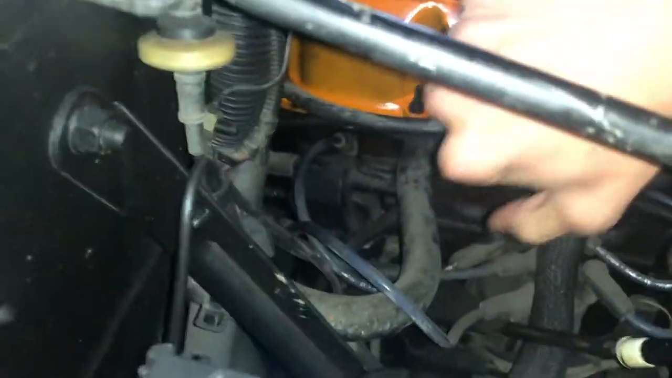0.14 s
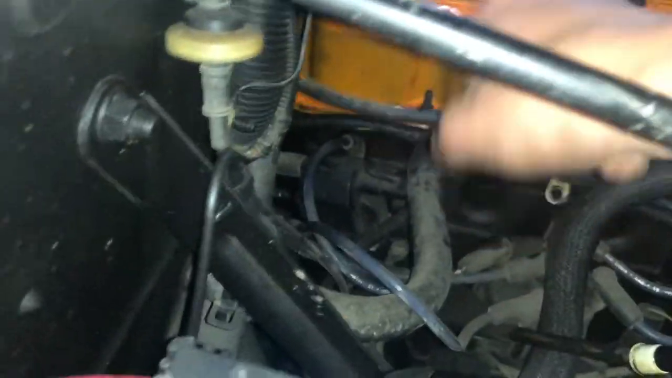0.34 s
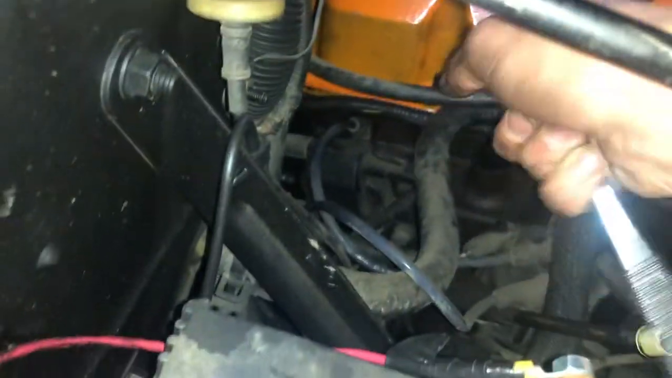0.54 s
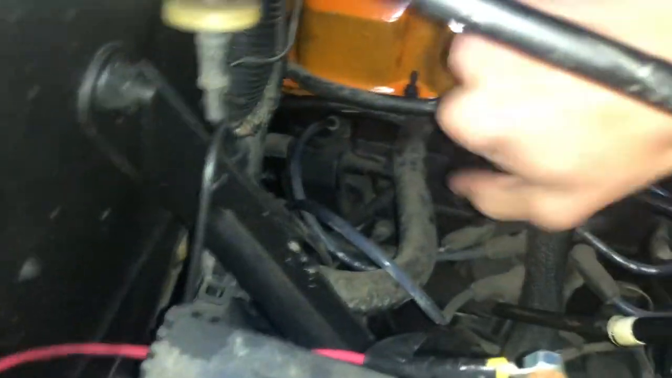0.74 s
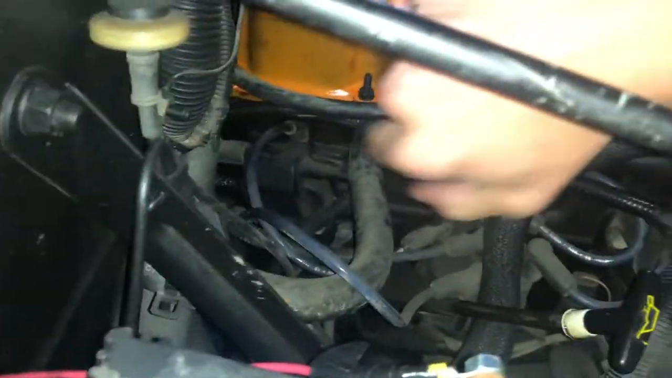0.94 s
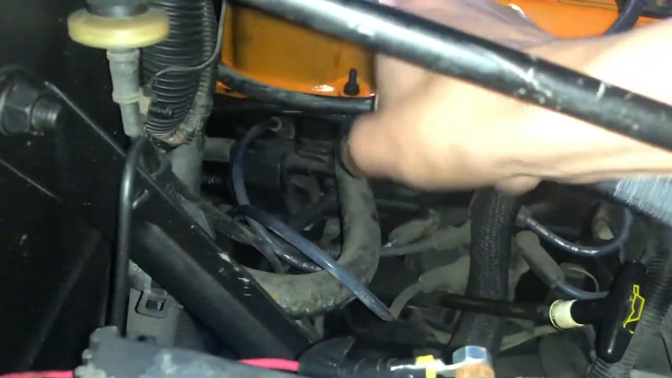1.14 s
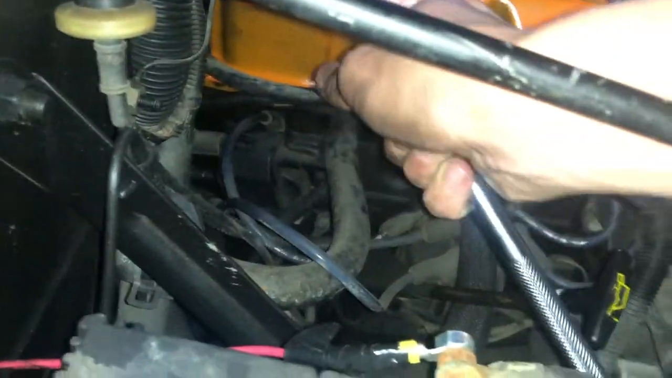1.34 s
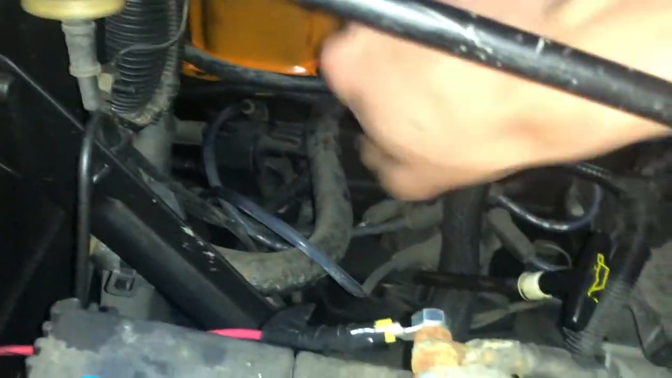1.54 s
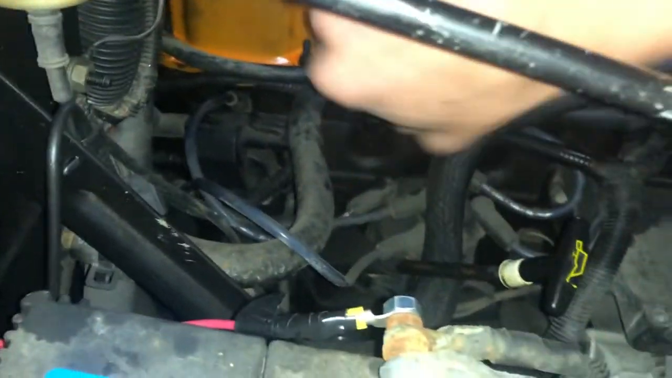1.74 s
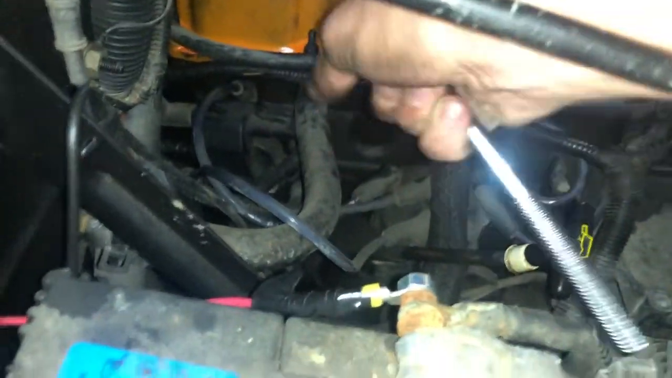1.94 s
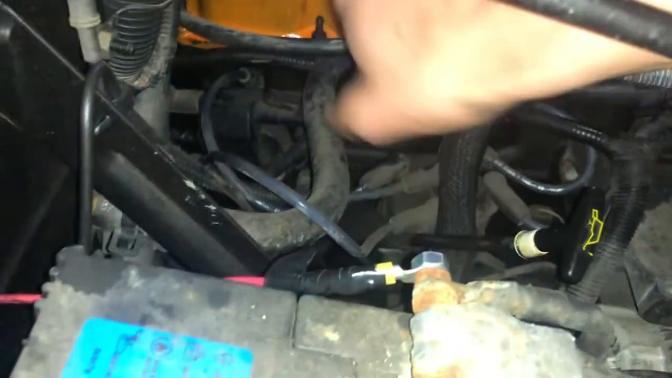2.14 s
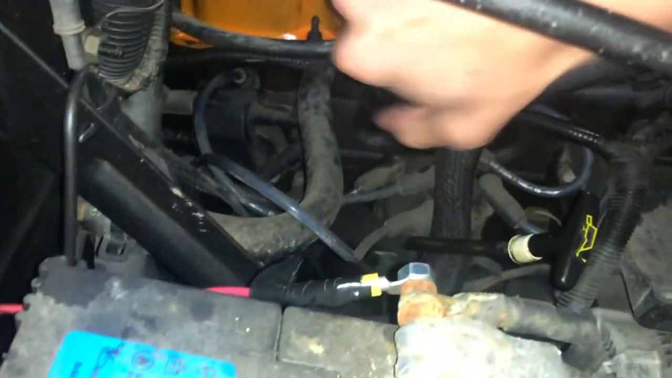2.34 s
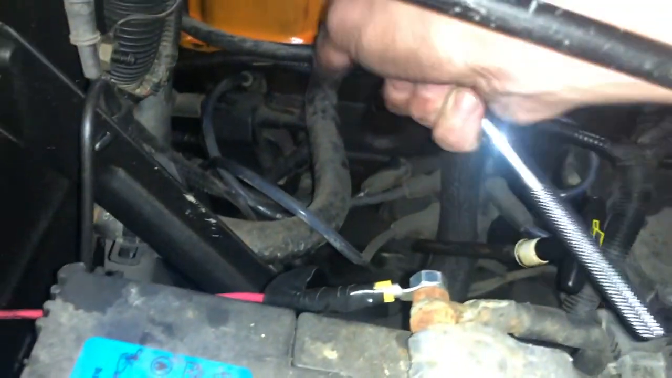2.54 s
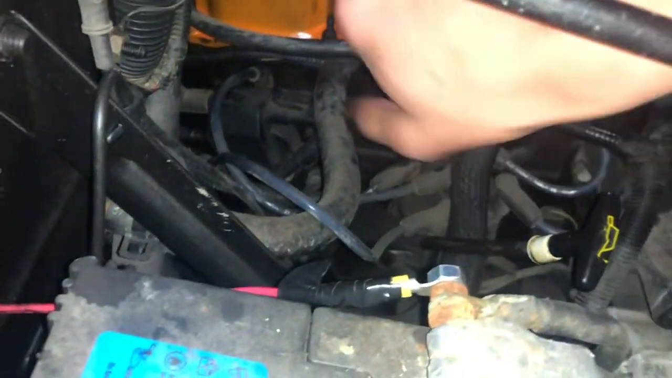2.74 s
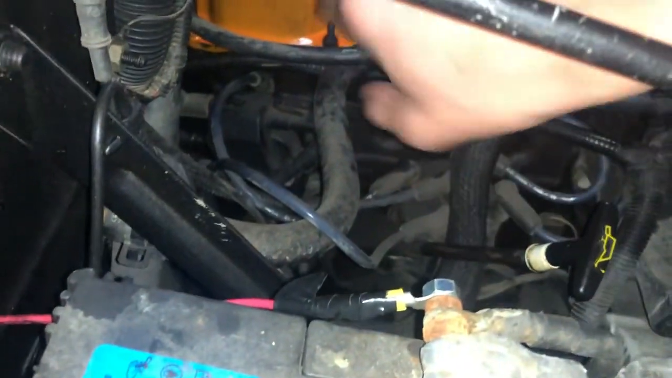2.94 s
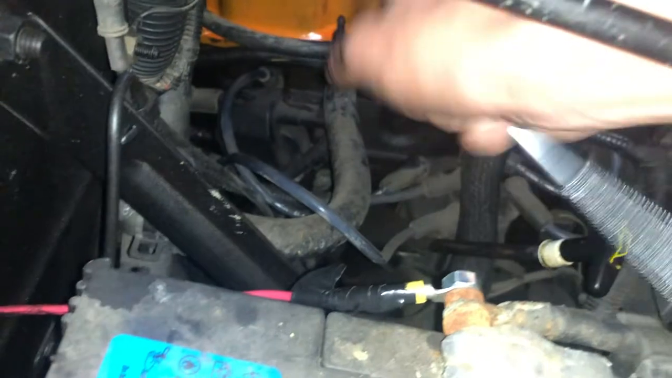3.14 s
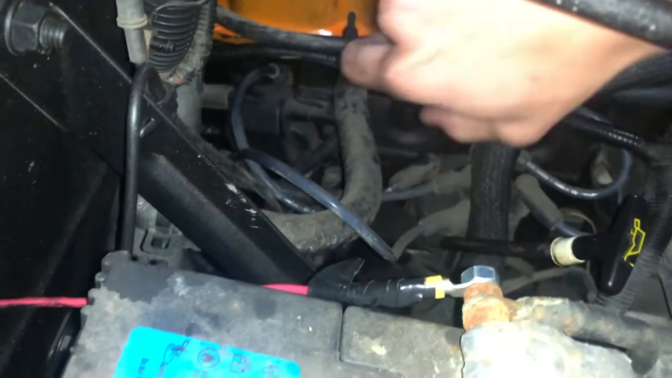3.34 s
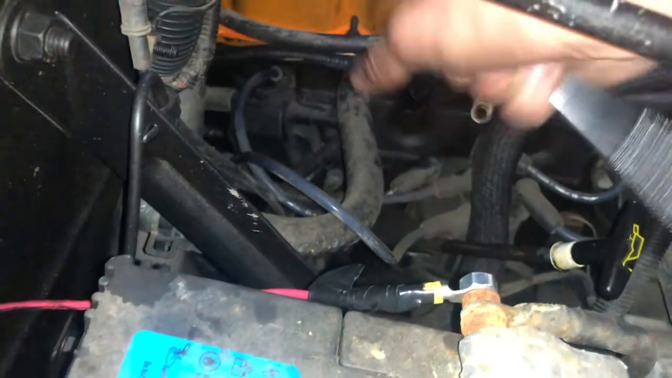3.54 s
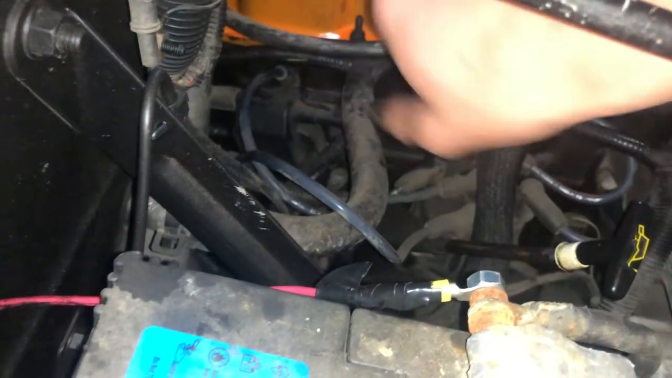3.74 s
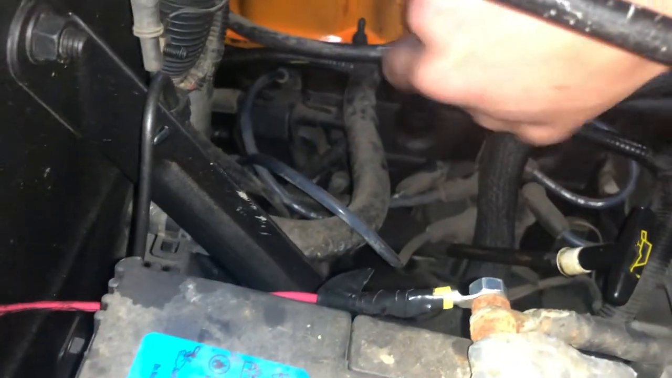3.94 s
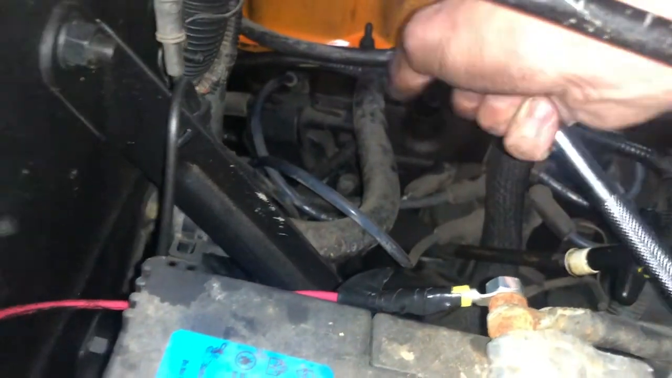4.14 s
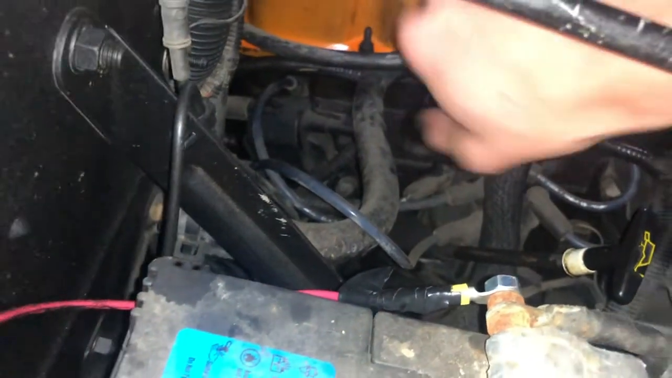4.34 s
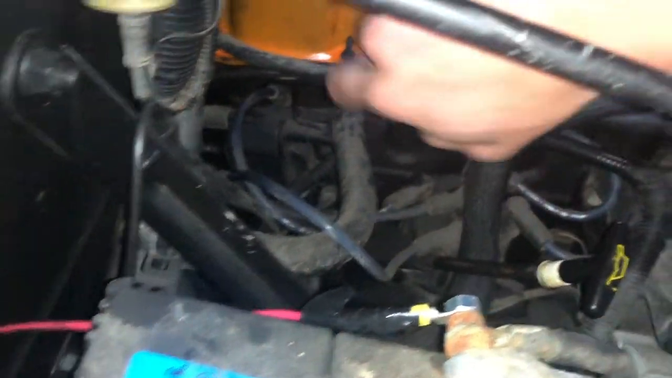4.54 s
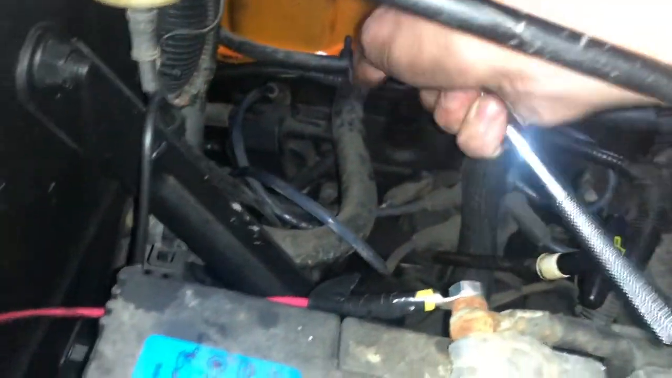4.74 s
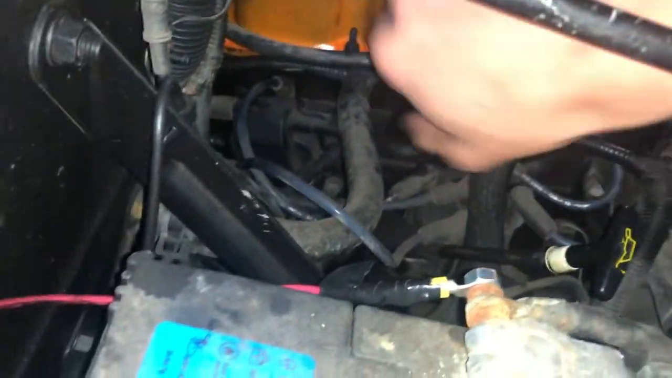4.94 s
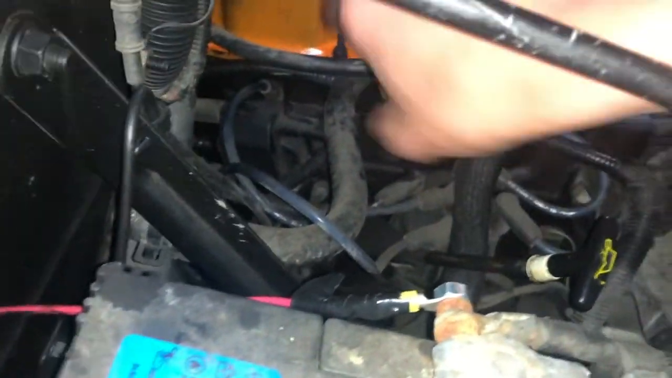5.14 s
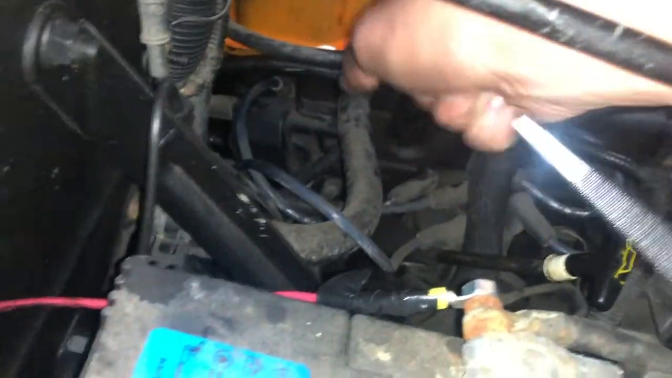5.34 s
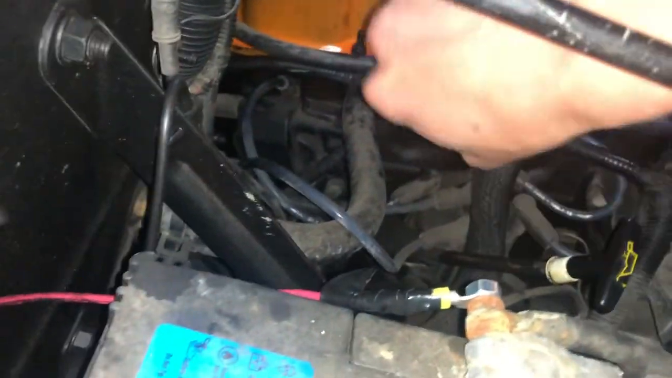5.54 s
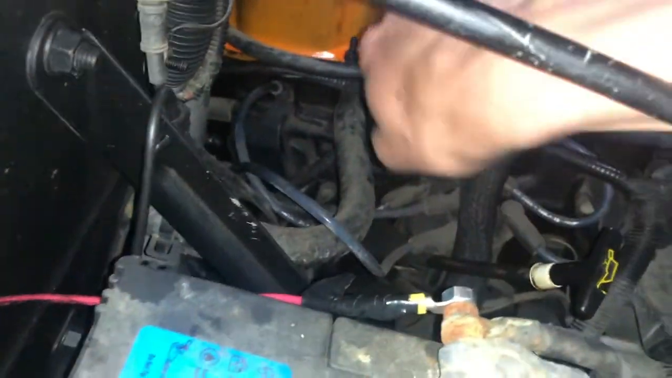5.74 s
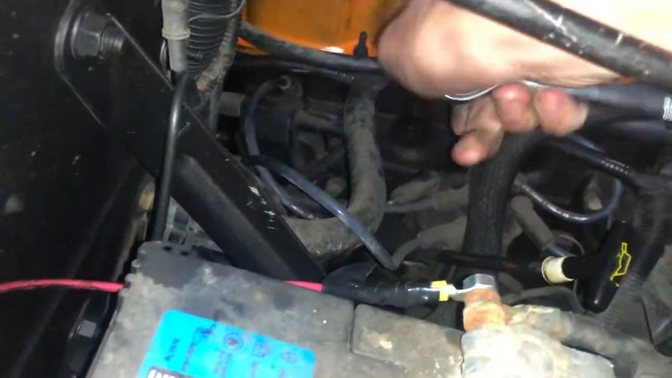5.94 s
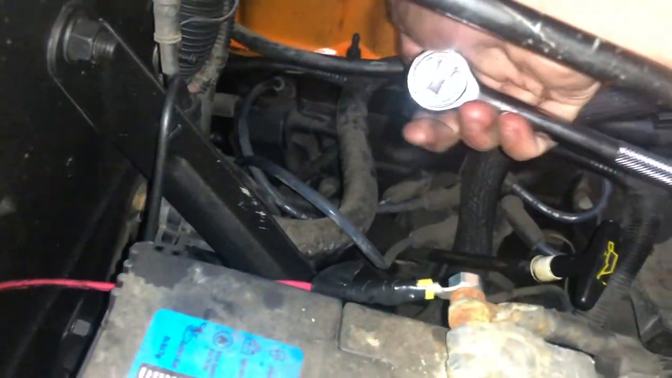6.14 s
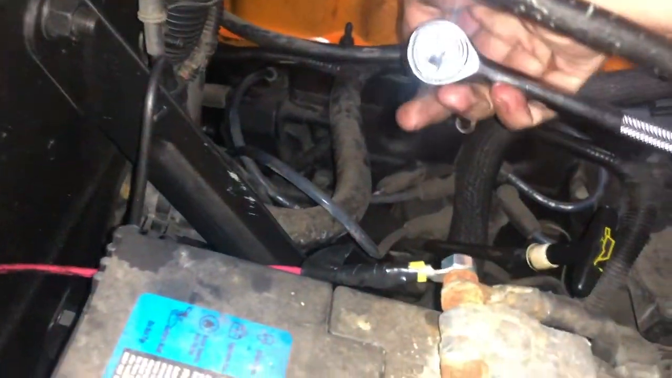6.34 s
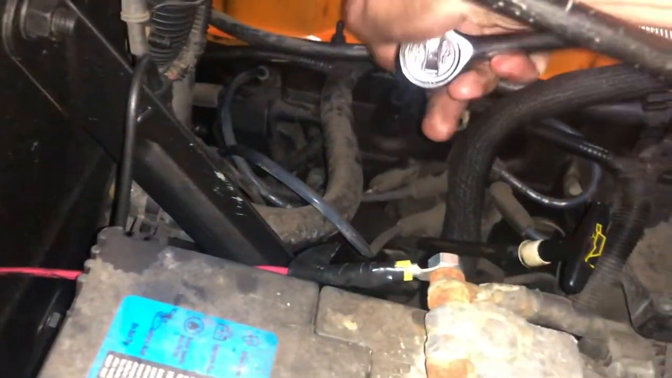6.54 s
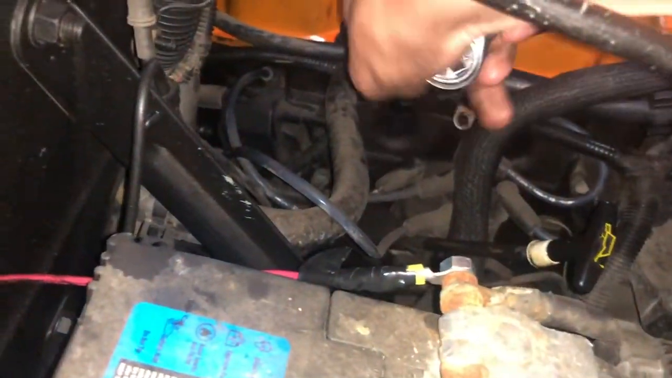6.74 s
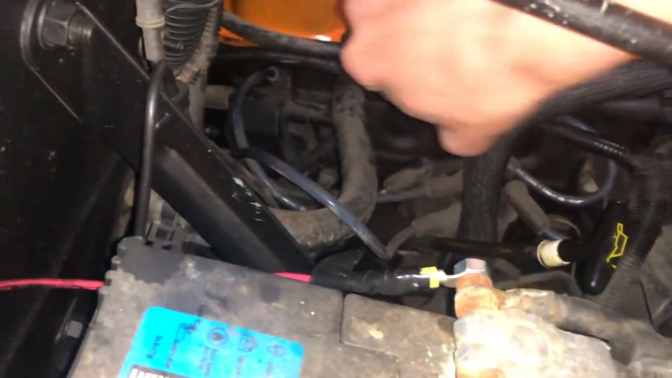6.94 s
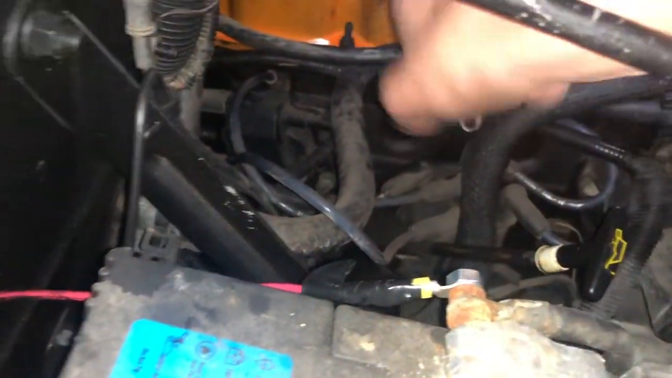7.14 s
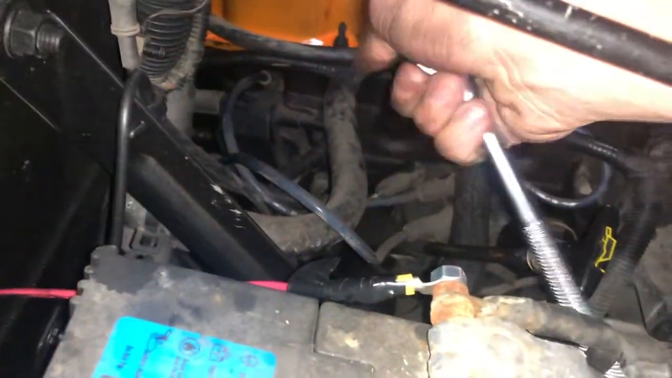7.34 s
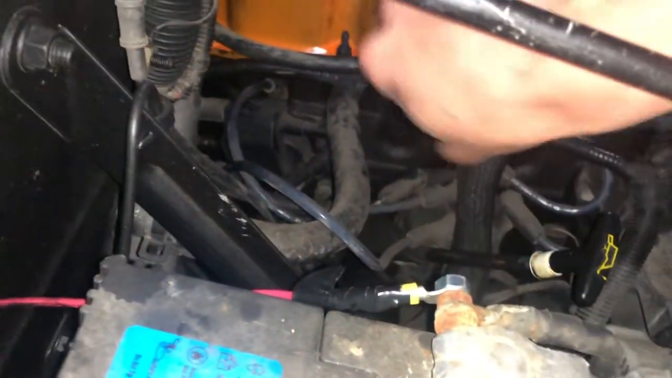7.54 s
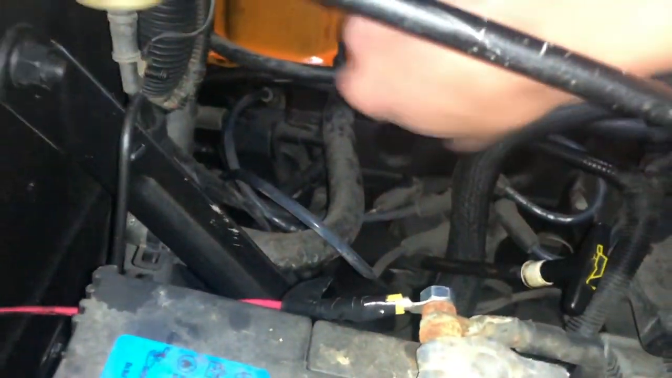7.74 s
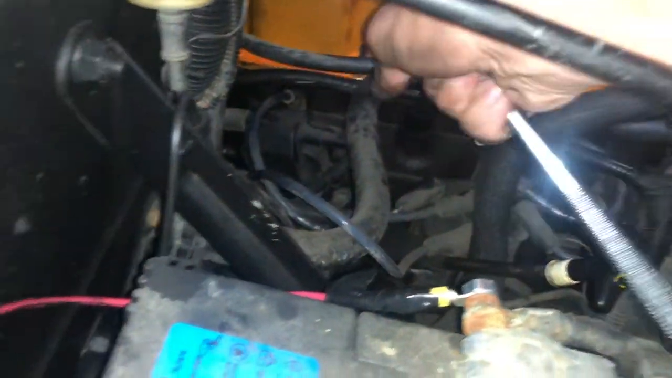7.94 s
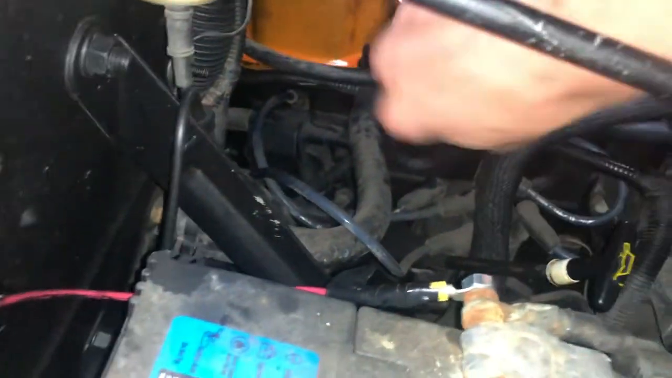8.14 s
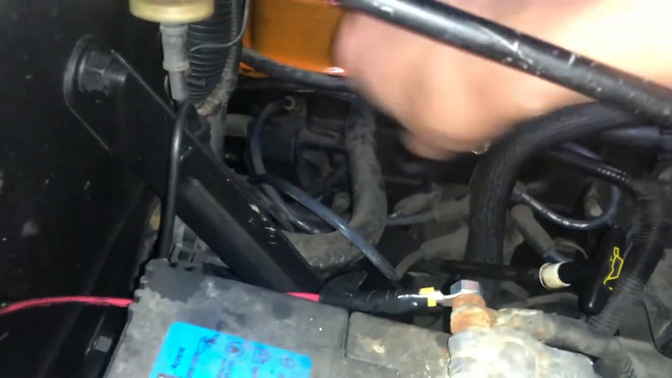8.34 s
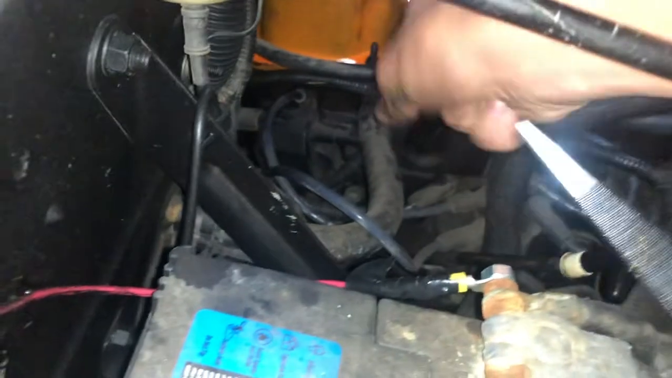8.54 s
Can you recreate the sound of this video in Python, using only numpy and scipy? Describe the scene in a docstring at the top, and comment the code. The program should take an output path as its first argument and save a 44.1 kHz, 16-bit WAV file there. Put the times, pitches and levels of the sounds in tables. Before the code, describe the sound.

Close to the microphone, a steel socket ratchet is swung to and fro in an open engine bay. Quick bursts of bright, dry clicks recur about twice a second, with faint loose ticks between them. One later burst slows to separate clicks, a near pause follows, then clicking returns with a firm bump. Faint traffic rumbles far off outdoors.

```python
"""A socket ratchet is swung to and fro in an open engine bay. A soft bump of the handle on the bodywork opens the
scene; then slack in the socket ticks and the pawl snaps over the gear teeth in bursts, ringing modes of the head.
After 5.7 s one burst goes slowly, faint ticks follow, and the bursts return around the strongest bump near 7.3 s.
Noise and decaying modes make each contact; a short and a long diffuse tail answer it.
Far traffic, as shaped noise, and a faint whine of unsteady sines lie under it all."""
import sys
import numpy as np
from scipy import signal
from scipy.fft import rfft, irfft, next_fast_len
from scipy.io import wavfile
from scipy.ndimage import map_coordinates

SR = 44100
rng = np.random.default_rng(int(sys.argv[2]) if len(sys.argv) > 2 else 0)


def log_audio(samples):
    """Write samples as a 16-bit WAV file to the path given in sys.argv[1]."""
    # one column per channel
    frames = np.atleast_2d(samples).T
    # limit to full scale, then quantise
    limited = np.clip(frames, -1, 1)
    pcm = np.round(limited * 32767).astype(np.int16)
    wavfile.write(sys.argv[1], SR, pcm)


N = 379701

# snaps of the pawl, one per tooth: start_s, blow_db (relative)
SNAPS = [(0.3209, -21.5), (0.3377, -18), (0.3533, -23.5), (0.3704, -20.5), (0.3832, -20.5), (0.3961, -25),
         (0.4097, -22), (0.4222, -21), (0.4378, -20.5), (0.4568, -20), (0.4826, -23), (0.51, -22.5),
         (0.5356, -22.0), (0.5641, -19), (1.0888, -22.5), (1.1037, -19), (1.1169, -18.5), (1.1302, -18.5),
         (1.144, -16), (1.1579, -20.0), (1.1737, -16), (1.1932, -18), (1.2217, -18.5), (1.252, -17.0),
         (1.2786, -19), (1.304, -19.0), (1.357, -21.0), (1.8492, -20.0), (1.8658, -19.0), (1.8788, -16.5),
         (1.8944, -20), (1.9047, -20), (1.916, -19.5), (1.9269, -21.5), (1.938, -25), (1.9482, -21.5),
         (1.9601, -19.5), (1.9752, -19.5), (2.0295, -19.5), (2.478, -19.5), (2.4908, -23.5),
         (2.4985, -19.5), (2.51, -23.5), (2.522, -20), (2.5316, -19.0), (2.5417, -18.5), (2.5495, -21.5),
         (2.5582, -22.5), (2.5687, -23.5), (2.632, -21), (3.0142, -19.5), (3.032, -25.5), (3.0445, -17),
         (3.0546, -21), (3.064, -20), (3.0747, -16.5), (3.0857, -20.5), (3.0972, -18), (3.11, -18.5),
         (3.1247, -16), (3.5063, -18.5), (3.532, -15.5), (3.546, -17.5), (3.5576, -18.5), (3.5753, -22),
         (3.5873, -18.5), (3.5985, -15), (3.6112, -18), (3.6245, -17.5), (3.6466, -18), (4.0802, -20.5),
         (4.0954, -21.5), (4.1054, -19.5), (4.1173, -20), (4.1255, -21.5), (4.136, -23), (4.1453, -18.5),
         (4.1562, -23), (4.1676, -19.0), (4.1778, -17.5), (4.6827, -20.5), (4.6947, -20.5), (4.7044, -21.0),
         (4.7141, -20), (4.724, -21), (4.7336, -20), (4.7433, -20.5), (4.753, -24), (4.7632, -23.0),
         (4.8288, -18), (5.222, -16.5), (5.2364, -21.5), (5.2466, -17), (5.2574, -21.0), (5.2687, -18.5),
         (5.2813, -18.5), (5.296, -16), (5.3174, -15.5), (5.781, -18), (5.8202, -18.5), (5.8636, -17.5),
         (5.9005, -18), (5.9379, -19.5), (5.9747, -18.0), (6.0325, -18.5), (6.127, -20), (7.1448, -19.5),
         (7.1675, -16), (7.1859, -17.5), (7.205, -21.5), (7.2233, -20.0), (7.241, -22.5), (7.2582, -17.5),
         (7.2733, -23.5), (7.2885, -22.5), (7.3059, -18.5), (7.3271, -15), (7.844, -24), (7.859, -19.5),
         (7.869, -22), (7.8776, -19), (7.8873, -24.5), (7.8956, -21), (7.906, -19.5), (7.915, -25),
         (7.9261, -24.5), (7.9376, -27), (7.9501, -21.5), (7.9723, -23.5), (8.3898, -16), (8.4004, -18.5),
         (8.4109, -21), (8.4205, -22.5), (8.4296, -18.5), (8.4424, -21.5), (8.4538, -22), (8.4646, -14),
         (8.476, -19.5), (8.489, -21.5), (8.5235, -19.5)]
# modes of the steel head: family (0 low to 4 high), frequency_hz, level_db (relative), t60_s
HEAD_MODES = [(0, 3890, -6.5, 0.039), (0, 4158, -4, 0.032), (0, 4440, -5.5, 0.015), (0, 4668, -6.5, .02),
              (0, 5126, -6.5, 0.014), (0, 5530, -9, 0.017), (1, 6080, -16.5, 0.045), (1, 6550, -10, .03),
              (1, 7064, -4, 0.054), (1, 7250, -3.5, 0.038), (2, 9317, 2.5, 0.018), (2, 9564, 0, 0.026),
              (2, 9870, -7, 0.01), (2, 9980, -6.5, 0.026), (3, 11370, 2, 0.039), (3, 11640, -1, 0.023),
              (4, 15480, -2.5, 0.037), (4, 15720, 3, 0.06)]
# modes of the socket: frequency_hz, width_hz, level_db (relative)
SOCKET_MODES = [(1330, 130, 0), (1649, 80, 1), (2217, 300, 0.5), (3016, 330, -1.5), (3710, 580, 1),
                (5200, 1300, -7)]


def pawl():
    """Impact excitation: each snap cracks, rebounds once, knocks the socket and rings decaying modes of the head."""
    # broad snap of steel on steel: frequency_hz, density_db (relative, per Hz)
    snap_spectrum = [(500, -30.5), (1000, -37), (2500, -26.5), (3500, -12.5), (6000, -8.5), (8500, -2),
                     (10700, -2), (13500, -5), (15000, -11), (17000, -5.5)]
    # colour of each place round the head: tooth, level_db of the five mode families low to high, knock_db
    places = [(0, -13.5, -9.5, -20.5, -8.5, -8.5, -24.5), (3, -18.0, -8.5, -18.5, -1.5, -13, -20),
              (6, -19, -2.5, -2, 2.5, -14.5, -22.5), (9.1, -10, -8.5, -6.5, -11.0, -7.5, -20.5),
              (11.6, -11.5, -11.0, -10.5, -3.0, -6, -19), (15.5, -22.5, -18, 1.5, -8, -10, -29),
              (18.7, -18, -16.5, -1.0, -21, -16, -27), (21.7, -17.5, -13, 0, -6, -21, -28.5),
              (24, -12.0, -9.5, -17.5, -7.5, -13.5, -25), (27.8, -13.5, -11, -4.5, -8.5, -4, -25.0),
              (31.3, -16.5, -13, -3.5, -5.5, -15, -25.5), (32.76, -17.0, -15.5, 7.5, -0.5, -3, -25),
              (35.9, -14, -15, -12.5, -6, -7, -25.5)]
    # sent all round the bay by the five mode families and the socket knock: level_db
    spread = [-13.5, -11.5, -6.5, -8.5, -16, -20.5]
    round_teeth = 38.5  # teeth after which the colour of the places repeats
    tooth_db = 2.5  # chance departure of each tooth from its place's colour, standard deviation

    snaps = np.array(SNAPS)
    t = np.arange(SR // 12) / SR
    n = len(snaps)

    # every mode takes a fresh strength, detuning and phase at each snap
    chance = rng.standard_normal((n, len(HEAD_MODES), 3))
    settle = 0.82 + 0.29 * np.exp(-(t / 0.0017) ** 3)  # the seating pawl soon damps part of the ring
    ring = np.zeros((5, n, len(t)))
    for k, (family, hz, db, t60) in enumerate(HEAD_MODES):
        level, detune, turn = chance[:, k].T[..., None]
        swing = np.sin(2 * np.pi * (hz * (1 + 0.0035 * detune) * t + turn))
        strength = amp(db + 4.5 * level)
        ring[round(family)] += strength * settle * fade(t, t60, 0.00029) * swing

    knots = rng.standard_normal((n, 24))  # no two teeth snap in the same colour

    def snap_response(hz):
        place = np.sqrt(hz / hz[-1])
        colour = np.array([np.interp(place, np.linspace(0, 1, num=24), row) for row in knots])
        return amp(along(snap_spectrum, hz) + 4.0 * colour)

    noise = unit(filtered(rng.standard_normal((n, len(t))), snap_response))
    from_rebound = np.abs(t - 0.0035 - 0.0006 * rng.standard_normal((n, 1)))  # s from the rebound onto the tooth
    crack = noise * (fade(t, 0.019, 0.0012) + 0.2 * np.exp(-from_rebound / 0.00043))

    puff = rng.standard_normal((n, len(t))) * fade(t, 0.025, 0.0012)
    knock = filtered(puff, resonances(SOCKET_MODES[:4]))
    parts = np.array([levelled(part, count=300) for part in (*ring, knock)])

    # the pawl walks round the head tooth by tooth
    tooth, *levels = np.transpose(places)
    facing = amp([np.interp(np.arange(n), tooth, db, period=round_teeth) for db in levels])[..., None]
    facing = facing * amp(tooth_db * rng.standard_normal((n, 6)).T[..., None])
    around = amp(spread)[:, None, None]

    def blows(shares):
        ringing = amp(-2.5) * (shares * parts).sum(axis=0)
        return placed(snaps[:, 0], amp(snaps[:, 1, None]) * (ringing + amp(3.5) * crack))

    return blows(facing), blows(around)


def handle_ring(around):
    """Narrow resonance: lightly damped modes linger after each snap."""
    # lingering modes: frequency_hz, width_hz, level_db
    handle_modes = [(3890, 7.6, -7.5), (4130, 14, -9), (7080, 18, -8.5), (9480, 25, -3.5), (11560, 22, -6),
                    (15710, 22, -8.5)]
    return filtered(around, resonances(handle_modes))


def ticks():
    """Light impacts: noise puffs excite socket modes near their pitch, and a bright share stirs the head."""
    # slack taps of socket and extension: start_s, level_db (relative), pitch_hz
    taps = np.array([(.2748, -48, 1580), (.2914, -35, 4000), (.3126, -36, 4100), (.5977, -40, 4380),
                     (.6145, -33.5, 3830), (.6377, -39.5, 4170), (.6494, -40.5, 1700), (.987, -53.5, 1330),
                     (1.0156, -55.5, 1280), (1.0535, -39, 2310), (1.0853, -26, 5300), (1.4631, -34.5, 4130),
                     (1.5028, -35.5, 3865), (1.7404, -52, 3230), (1.8038, -33.5, 2360), (2.1146, -34, 1300),
                     (2.358, -51.5, 4310), (2.4274, -51.5, 1322), (2.4453, -40.5, 1334),
                     (2.4717, -37.5, 4930), (2.7212, -32.5, 3750), (2.9764, -45, 1658), (2.9941, -34, 5150),
                     (3.1911, -44.5, 4130), (3.2211, -41, 1305), (3.236, -35, 1303), (3.3822, -51.5, 1330),
                     (3.486, -34, 4130), (3.5024, -35, 4140), (3.7145, -28.5, 4130), (3.7417, -33.5, 3830),
                     (3.7648, -33.5, 4700), (3.8751, -49.5, 5660), (3.998, -46.5, 1732),
                     (4.0325, -44, 2370), (4.0442, -33.5, 4130), (4.2265, -43, 5460), (4.2583, -38, 1330),
                     (4.2887, -47, 1340), (4.3126, -40, 1670), (4.6254, -46.5, 1283), (4.6473, -41, 3760),
                     (4.6774, -39, 3780), (5.03, -51.5, 1340), (5.1623, -48, 1340), (5.1976, -38, 4030),
                     (5.2167, -35.5, 4210), (5.489, -42, 1310), (5.7015, -49, 5480), (5.7159, -32, 1335),
                     (6.3809, -54, 3970), (6.5306, -52, 3910), (6.6024, -57, 1610), (7.0983, -48.5, 1622),
                     (7.1164, -40, 4020), (7.438, -39, 3830), (7.4857, -32.5, 3820), (7.5056, -29.5, 3140),
                     (7.7998, -41.5, 1340), (8.088, -37, 2760), (8.1259, -33, 3510), (8.172, -48, 3860),
                     (8.3404, -36.5, 4200), (8.3754, -35.5, 4410)])
    loose_db, loaded_db = -21.5, -9  # mean bright share, far from a snap and just before one
    loading_s = 0.027  # time constant as the pawl spring loads before a snap

    t = np.arange(SR // 20) / SR
    snap_times = np.r_[np.array(SNAPS)[:, 0], np.inf]
    wait = snap_times[np.searchsorted(snap_times, taps[:, 0])] - taps[:, 0]
    bright_db = loose_db + (loaded_db - loose_db) * np.exp(-wait / loading_s)
    bright_db = bright_db + 3 * rng.standard_normal(len(taps))

    puff = rng.standard_normal((len(taps), 2, len(t))) * fade(t, 0.041, 0.00091)
    head = resonances([(hz, 250, db) for family, hz, db, t60 in HEAD_MODES if family])
    socket = resonances(SOCKET_MODES)

    def near_pitch(f):
        octaves = np.log2((f + 1) / taps[:, 2, None])
        return amp(-2.5 * octaves ** 2) * socket(f)

    def bright(f):
        falling = amp(-6 * np.log2((f + 1) / 5500)) * (f > 4500)  # 6 dB per octave
        return falling + amp(-6.0) * head(f)

    dull = levelled(filtered(puff[:, 0], near_pitch), count=400)
    sharp = levelled(filtered(puff[:, 1], bright), count=400)
    mix = amp(-14.5) * dull + amp(bright_db[:, None]) * sharp
    return placed(taps[:, 0], amp(taps[:, 1, None]) * mix)


def bumps():
    """Forced vibration: a rough, soft contact drives the panel, then a faint rattle; deep modes answer last."""
    # contacts with the bodywork: start_s, deep_db, low_db, middle_db, high_db, contact_s
    contacts = np.array([(0.025, -57, -53.5, -53, -78, 0.013), (.6, -50.5, -59, -52, -63.5, 0.012),
                         (.634, -51, -60.5, -58, -62.5, 0.0095), (1.595, -71.5, -54.5, -58.5, -74.5, 0.014),
                         (1.739, -76, -79, -58.5, -75, 0.01), (1.907, -65, -62, -63, -65.5, 0.0075),
                         (2.025, -67, -59, -62.5, -75, 0.008), (3.148, -40.5, -46.5, -59.5, -76.5, .02),
                         (5.237, -72.5, -55.5, -57.5, -67, 0.013), (7.34, -34.5, -41.5, -28, -34, 0.029),
                         (7.814, -65, -53.5, -58.5, -64, 0.019), (8.538, -39.5, -47.5, -46.5, -63, 0.012)])
    # modes of the panel: group (0 deep to 3 high), frequency_hz, width_hz, level_db (relative)
    panel_modes = [(0, 150, 25, 0), (1, 215, 45, 0), (1, 340, 90, -10), (2, 450, 30, 0), (2, 530, 55, 0),
                   (2, 605, 60, -2), (2, 780, 140, -14), (3, 1170, 90, 0), (3, 1450, 170, -5),
                   (3, 1700, 170, -7), (3, 2250, 350, -6)]

    t = np.arange(SR // 2) / SR
    out = np.zeros(N)
    for group, lag_s in enumerate([0.0065, 0.003, 0.0014, 0.0011]):
        u = t / np.clip(contacts[:, 5, None], 0.002, 1)  # time in contact lengths
        contact = (1 - np.exp(-t / 0.0016)) * np.exp(-u ** 3)
        rattle = 0.06 * fade(t, 0.72, 0.012)
        push = rng.standard_normal(u.shape) * (contact + rattle)
        body = resonances([mode[1:] for mode in panel_modes if round(mode[0]) == group])
        # little is radiated below 90 Hz
        answer = filtered(push, lambda f: body(f) * f ** 2 / (f ** 2 + 90 ** 2))
        level = amp(contacts[:, 1 + group, None])
        out += placed(contacts[:, 0] + lag_s, level * levelled(answer, count=1300))
    return out


def bracket_ring(knocks):
    """High-Q resonance: the bumps leave a thin ring behind."""
    # ringing mode: frequency_hz, width_hz, level_db
    bracket_modes = [(1190, 2.5, 6)]
    return filtered(knocks, resonances(bracket_modes))


def near_tail(x):
    """Short reverberation: the treble and middle die away within a fraction of a second."""
    # decay of the near tail: frequency_hz, t60_s
    bay_decay = [(1000, 0.19), (4000, 0.053), (9000, 0.05), (15000, 0.057)]
    return amp(-11.5) * tail(x, bay_decay, 0.004)


def far_tail(x):
    """Long reverberation: a later, weaker tail in which the treble dies first."""
    # decay of the far tail: frequency_hz, t60_s
    yard_decay = [(500, 1), (4000, 1), (9000, 0.64), (15000, 0.4)]
    return amp(-24.5) * tail(x, yard_decay, 0.014)


def outdoors():
    """Broadband and tonal noise: far traffic swells slowly over a few unsteady motor lines."""
    # traffic spectrum: frequency_hz, density_db (relative, per Hz)
    traffic_spectrum = [(18, -30), (42, -23), (98, -0.5), (130, -12.5), (164, -5), (241, -10.5),
                        (521, -13.5), (577, -16), (1020, -24.5), (1280, -20), (2040, -29), (2310, -28),
                        (14000, -43)]
    # course of the traffic before its random wobble: time_s, level_db
    swell = [(0.0, -61.5), (2.01, -62.5), (2.13, -63), (3.0, -63), (3.19, -61), (4.56, -63.5), (5.18, -63),
             (5.28, -61.5), (7.31, -64.5), (7.5, -57.5), (8.22, -61), (8.61, -58.5)]
    # motor lines: frequency_hz, level_db (relative)
    whine = [(58, -74.5), (118, -74.5), (991, -86.5), (1112, -92)]

    s, db = np.transpose(swell)
    t = np.arange(N) / SR
    rush = unit(filtered(rng.standard_normal(N), lambda hz: amp(along(traffic_spectrum, hz))))
    lines = np.zeros(N)
    for hz, level in whine:
        strength = amp(level + 7.5 + 0.71 * wobble(6.1))
        lines += strength * np.sin(2 * np.pi * hz * t + 1.4 * wobble(2.8))
    return amp(np.interp(t, s, db) + 0.84 * wobble(5.2)) * rush + lines


def tail(x, decays, gap):
    """Diffuse echoes after a gap (s): each stretch of sound meets a new pattern, as the wrench moves."""
    out, step = np.zeros(N + 2 * SR), SR // 8
    for start in range(0, N, step):
        hz, t, z = signal.stft(rng.standard_normal(SR * 3 // 4), SR, nperseg=256)
        decay = amp(-60 * t / along(decays, hz)[:, None])
        echo = signal.istft(z * decay, SR, nperseg=256)[1]
        wet = signal.fftconvolve(x[start:start + step], echo / np.linalg.norm(echo))
        out[start + round(gap * SR):][:len(wet)] += wet
    return out[:N]


def resonances(modes):
    """Modal superposition: the causal response of (Hz, width Hz, dB) modes with alternating signs."""
    def response(f):
        total = 0
        for k, (centre, width, db) in enumerate(modes):
            damping = 1j * f * width
            total = total + (-1) ** k * amp(db) * damping / (centre * centre - f * f + damping)
        return total

    return response


def fade(t, t60, attack):
    """Damped envelope: a quick rise (time constant in s) and an exponential fall of 60 dB in t60 (s)."""
    return amp(-60 * t / t60) * (1 - np.exp(-t / attack))


def filtered(x, response):
    """Linear filtering: the spectrum of x times a response of frequency, along the last axis."""
    n = x.shape[-1]
    m = next_fast_len(n + 8192)  # padding leaves room for ringing
    return irfft(rfft(x, m) * response(np.fft.rfftfreq(m, 1 / SR)), m)[..., :n]


def placed(times, sounds):
    """Superposition in time: each row of sounds is added at its time (s)."""
    at = np.round(times * SR).astype(int)[:, None] + np.arange(sounds.shape[1])
    return np.bincount(at.ravel(), sounds.ravel(), N + SR)[:N]


def levelled(rows, count):
    """Onset normalisation: each row is scaled to rms 1 over its first count samples."""
    return rows / np.sqrt(np.mean(rows[:, :count] ** 2, axis=1, keepdims=True))


def wobble(rate):
    """Slow random modulation: a smooth curve through rate random knots a second."""
    return map_coordinates(rng.standard_normal(int(N * rate / SR) + 4), [np.arange(N) * rate / SR])


def along(points, hz):
    """Logarithmic frequency scale: (Hz, value) points are interpolated on a log axis."""
    f, v = np.transpose(points)
    return np.interp(np.log(hz + 1), np.log(f + 1), v)


def amp(db):
    """Level to amplitude: 20 dB is a factor of ten."""
    return 10 ** (np.asarray(db) / 20)


def unit(x):
    """Power normalisation: the whole array is scaled to rms 1."""
    return x / np.sqrt(np.mean(x ** 2) + 1e-20)


def scene():
    """Superposition: direct sounds, their two tails and the outdoor background add."""
    direct, around = pawl()
    knocks = bumps()
    rest = ticks() + knocks + bracket_ring(knocks) + handle_ring(around)
    near = near_tail(direct + rest)
    far = far_tail(around + 0.52 * direct + rest)  # far echoes mix every direction: a steadier colour
    return (direct + rest + near + far + outdoors())[None]


def record(dry):
    """Saturation and band limiting: the input stage rounds off the loudest snaps and cuts the top treble."""
    top_hz = 15900
    rounded = dry / (1 + np.abs(dry / 0.52) ** 4) ** (1 / 4)
    return filtered(rounded, lambda hz: 1 / (1 + np.exp(np.clip((hz - top_hz) / 30, -50, 50))))


dry = scene()
out = record(dry)
log_audio(out)
```